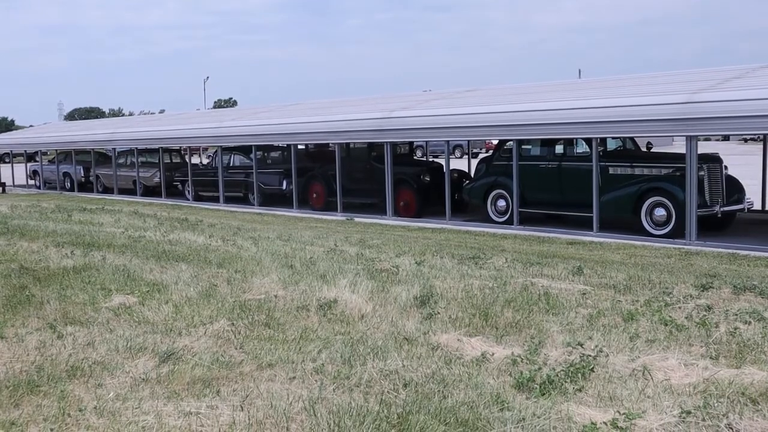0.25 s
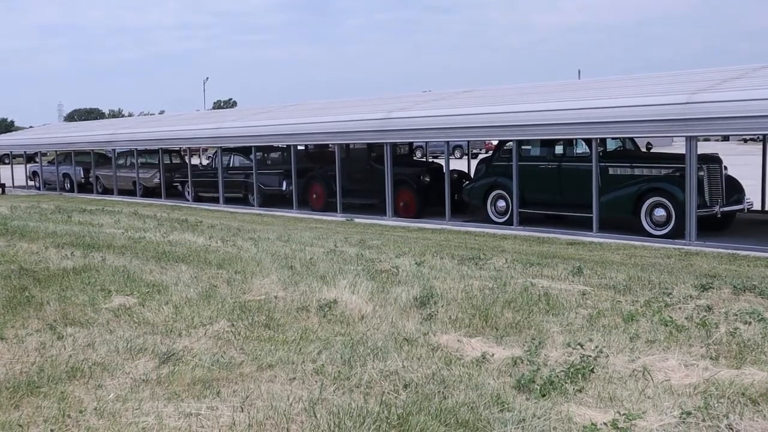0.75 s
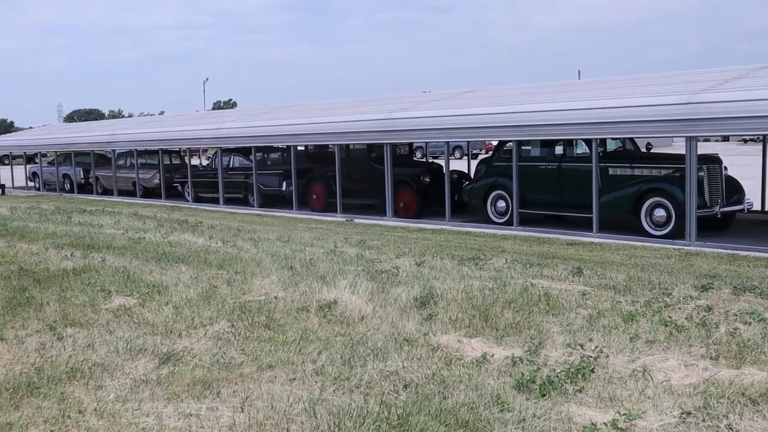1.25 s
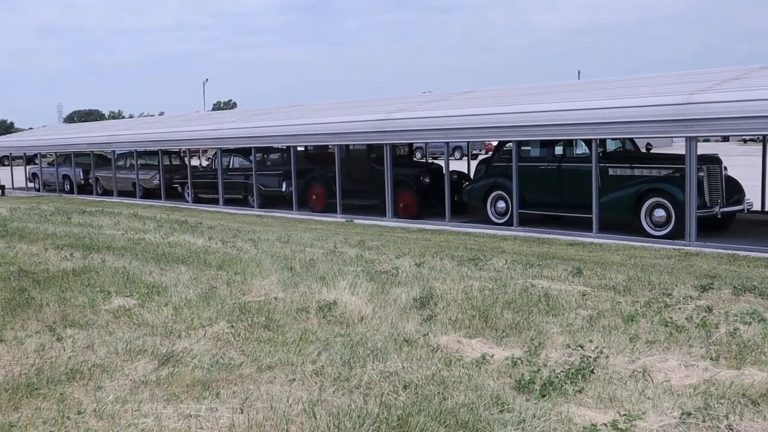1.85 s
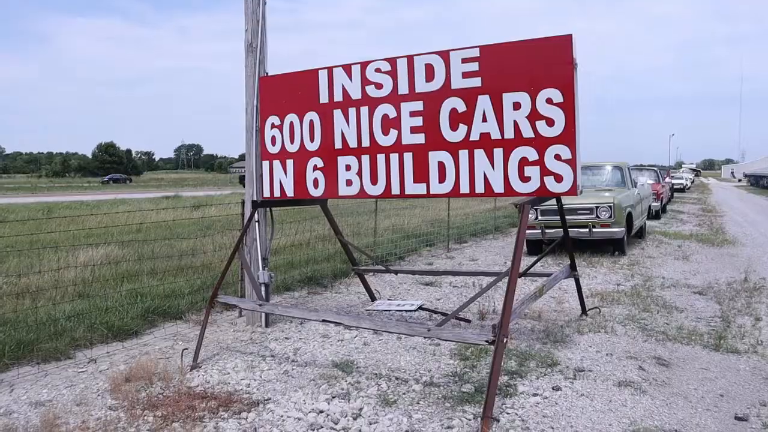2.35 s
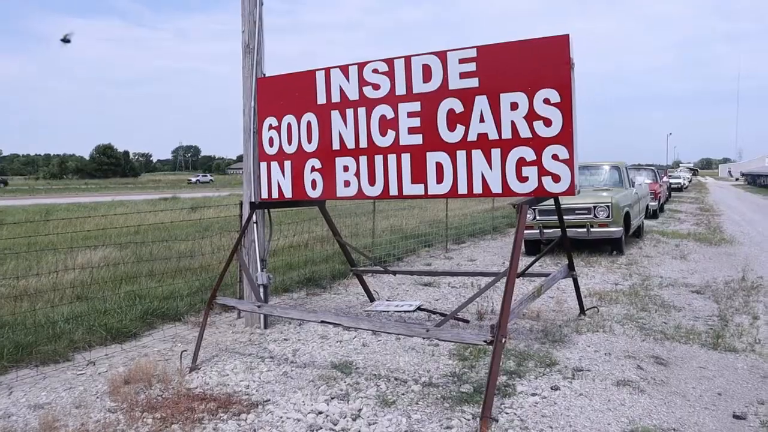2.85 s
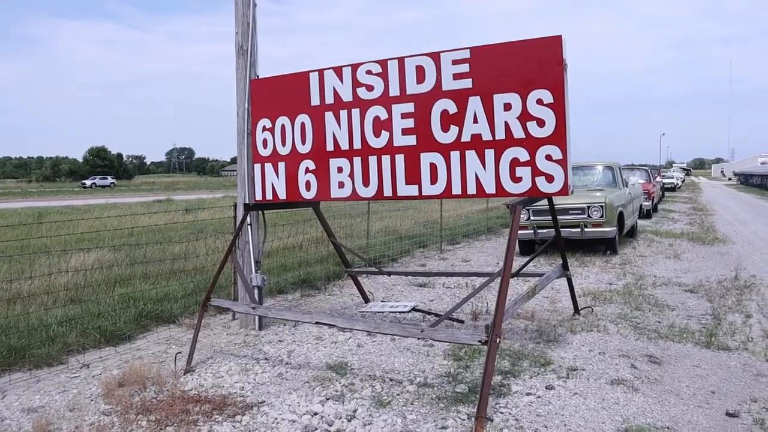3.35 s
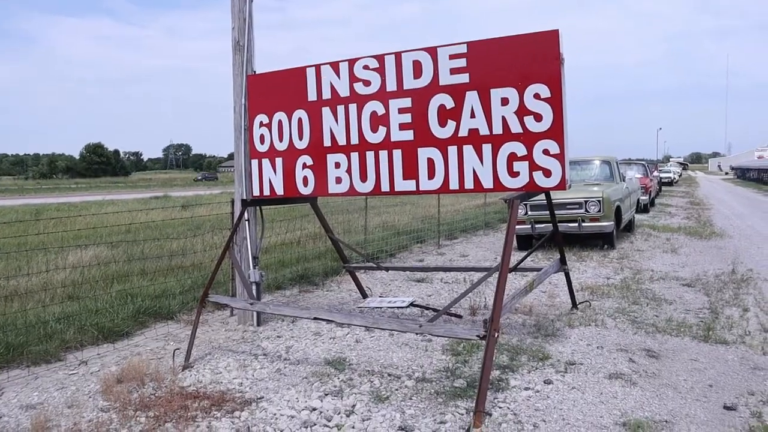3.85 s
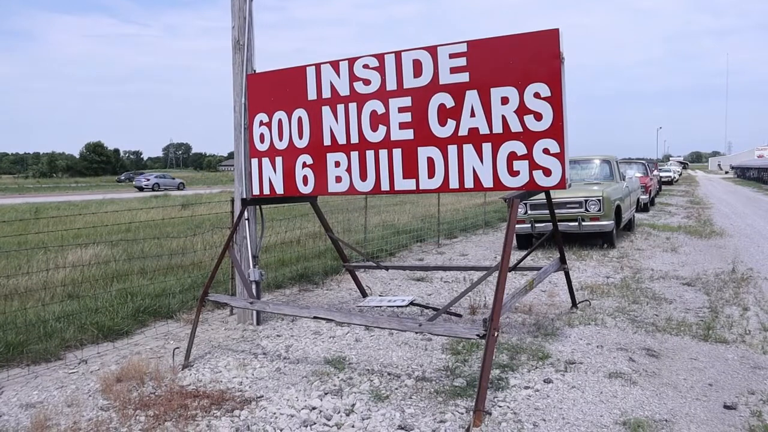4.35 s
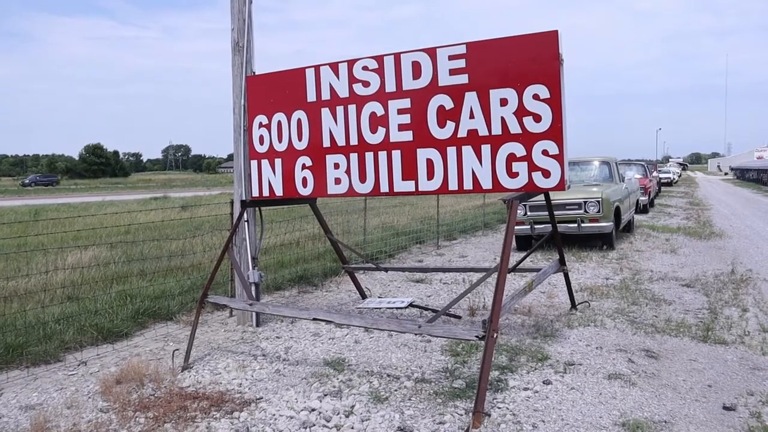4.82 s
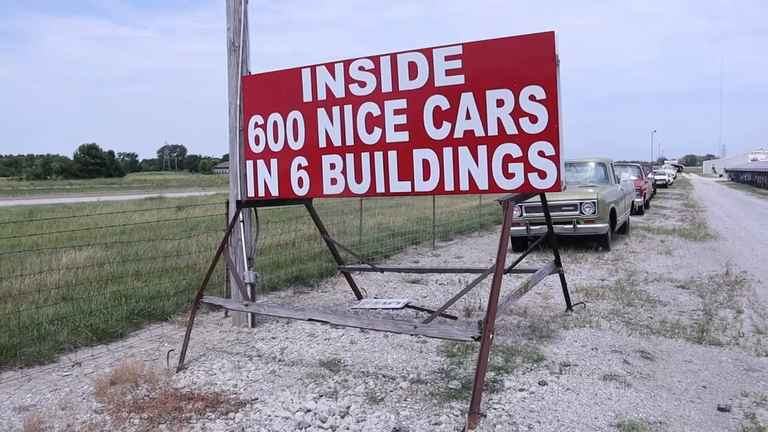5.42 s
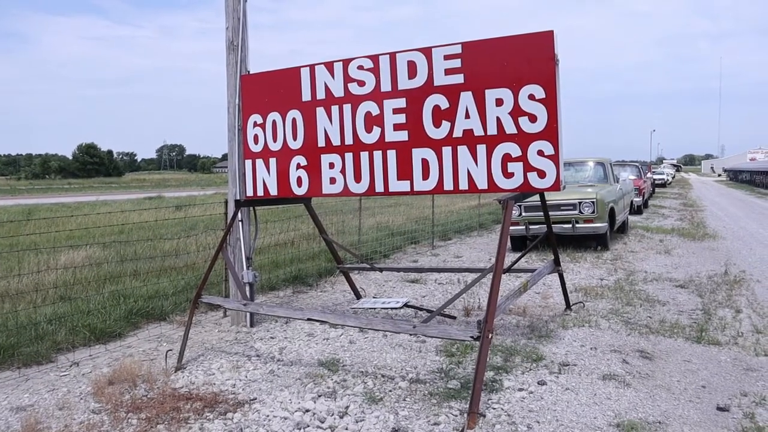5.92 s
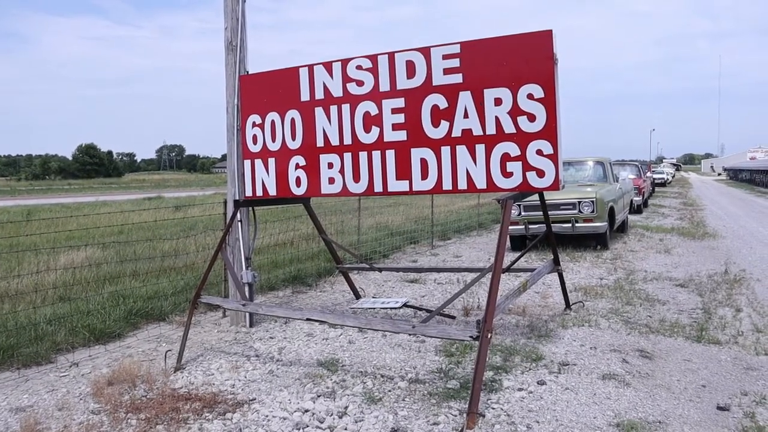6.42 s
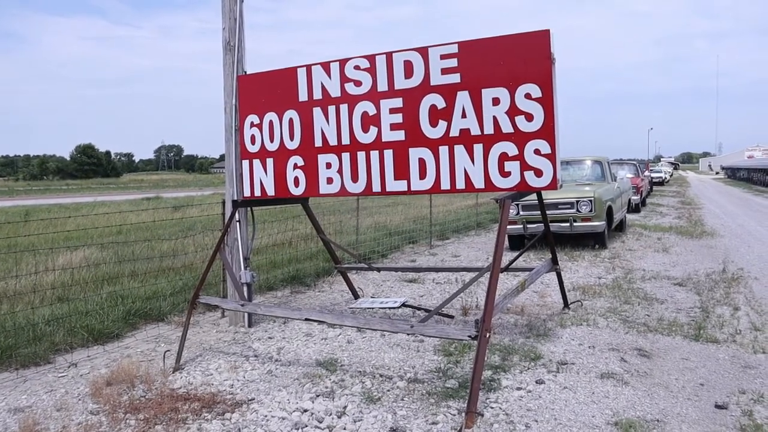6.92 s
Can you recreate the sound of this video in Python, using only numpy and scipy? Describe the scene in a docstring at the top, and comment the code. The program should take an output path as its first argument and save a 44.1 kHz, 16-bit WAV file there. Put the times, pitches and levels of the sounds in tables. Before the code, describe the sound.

Heavy wind buffeting outdoors, a tiny silent break, then highway tyre roar with lighter wind bumps, repeated high bird calls and a growing truck whine.

```python
"""Gusty wind thuds on two close microphone ports in an open field beside a highway, in two parts split by a short
near-silent gap. Wind is a sum of short damped pushes, dense weak ones plus listed hard ones, over a slow swing.
The second part has lighter gusts and adds tyre noise (patchy filtered noise, a sung whine, an engine hum) of far
cars and a nearing truck, gritty scuffs (gated noise) and a small bird (gliding sine). Far road hiss runs throughout.
Every source has a middle and a side colour; the outputs are their sum and difference."""
import sys
import numpy as np
from scipy import signal
from scipy.fft import rfft, irfft, next_fast_len
from scipy.io import wavfile
from scipy.ndimage import uniform_filter1d, map_coordinates

SR = 44100
rng = np.random.default_rng(int(sys.argv[2]) if len(sys.argv) > 2 else 0)


def master(y):
    """Save y as 16-bit WAV."""
    cut = np.clip(np.atleast_2d(y).T, -1, 1)
    pcm = np.round(cut * 32767)  # scale
    wavfile.write(sys.argv[1], SR, pcm.astype(np.int16))


N = 316638

# near-silent join of the two parts: (start [s], end [s])
GAP_START_S, GAP_END_S = (2.3057, 2.3392)


def amp(db):
    """Decibels to gain."""
    return 10 ** (np.asarray(db) / 20)


def unit(x):
    """Scale to rms 1."""
    return x / np.sqrt(np.mean(x ** 2, -1, keepdims=True) + 1e-20)


def along(points, hz):
    """Gain at hz from (frequency [Hz], level [dB]) points, interpolated on a log axis."""
    point_hz, point_db = np.transpose(points)
    return amp(np.interp(np.log(hz + 1), np.log(point_hz + 1), point_db))


def coloured(points):
    """Response of this colour that keeps white noise of rms 1 at rms 1."""
    return lambda hz: unit(along(points, hz))


def curves(rows):
    """One value per sample for each column after the time."""
    s, *columns = np.transpose(rows)
    return [np.interp(np.arange(N) / SR, s, column) for column in columns]


def wobble(rate_hz):
    """Smooth random curve with rate_hz knots a second."""
    knots = rng.standard_normal(int(N * rate_hz / SR) + 4)
    return map_coordinates(knots, [np.arange(N) * rate_hz / SR])


def filtered(x, response):
    """Apply a complex response of frequency to x."""
    m = 2 * next_fast_len(N // 2 + 4096)
    return irfft(rfft(x, m) * response(np.fft.rfftfreq(m, 1 / SR)), m)[..., :N]


def patchy(depth_db):
    """White noise whose gain drifts in patches of time and frequency."""
    z = signal.stft(rng.standard_normal(N), nperseg=512)[2]
    field = uniform_filter1d(rng.standard_normal(z.shape), size=6, axis=0)
    field = uniform_filter1d(field, size=12, axis=1)
    return signal.istft(z * amp(depth_db * field / field.std()), nperseg=512)[1][:N]


# far road hiss colours, middle and side: (frequency [Hz], relative level [dB per Hz])
FAR_MIDDLE = [(710, -32), (1200, -19), (1540, -6), (2890, -19.5), (5800, -32.5), (12100, -53)]
FAR_SIDE = [(1060, -36), (1800, -0.5), (1990, -11.5), (2720, -11.5), (11000, -29.5)]
FAR_DB = -60


def far_road():
    """Distant road: faint smooth hiss, filtered noise independent in middle and side."""
    colour = lambda hz: np.array([along(FAR_MIDDLE, hz), along(FAR_SIDE, hz)])
    return amp(FAR_DB) * unit(filtered(rng.standard_normal((2, N)), colour))


# stone scuffs: (peak time [s], envelope level [dB])
SCUFFS = [(3.864, -34), (3.895, -35.5), (3.965, -34)]
# grit colour: (frequency [Hz], relative level [dB per Hz])
GRIT = [(500, -33), (1200, 14.5), (2000, 11), (3500, -3.5), (5500, -12), (11000, -46)]
SCUFF_RISE_DB_PER_S, SCUFF_FALL_DB_PER_S = 695, 344
SCUFF_MIDDLE_DB, SCUFF_SIDE_DB = 0.5, -3


def scuff():
    """Gritty scuffs of stones: sparse sharp grains under short rises, stronger in front than to the side."""
    t = np.arange(N) / SR
    rises = np.zeros(N)
    for s, db in SCUFFS:
        drop_db = np.where(t < s, SCUFF_RISE_DB_PER_S * (s - t), SCUFF_FALL_DB_PER_S * (t - s))
        rises += amp(db - drop_db)
    grains = unit(rng.standard_normal((2, N)) * amp(3.4 * wobble(600)))
    return amp([[SCUFF_MIDDLE_DB], [SCUFF_SIDE_DB]]) * filtered(rises * grains, coloured(GRIT))


HUM_HZ, HUM_DB, HUM_ENDS_S = 230.5, -54, 3.8


def engine_hum():
    """Faint engine hum of the fading car: a steady sine that fades out over its last second."""
    t = np.arange(N) / SR
    return amp(HUM_DB) * np.clip(HUM_ENDS_S - t, 0, 1) * np.sin(2 * np.pi * HUM_HZ * t)


WHINE_FROM_S, WHINE_START_HZ, WHINE_SAG_HZ_PER_S = 5.4, 1099, 8.5
WHINE_START_DB, WHINE_GROWS_DB_PER_S = -38.5, 2  # before fade-in and wobble


def tread_whine():
    """Tread blocks singing: a sagging, growing sine whose pitch blurs as the truck nears."""
    since = np.arange(N) / SR - WHINE_FROM_S
    level = amp(WHINE_START_DB + WHINE_GROWS_DB_PER_S * since) * np.clip(since / 0.2, 0, 1)
    hz = WHINE_START_HZ - WHINE_SAG_HZ_PER_S * since
    blur_hz = 1.8 * since ** 2 * wobble(15)
    phase = 2 * np.pi * np.cumsum(hz + blur_hz) / SR
    return level * amp(wobble(5)) * np.sin(phase)


# a car fading, then the truck nearing; levels before the swell:
# (time [s], roar [dB], hiss [dB], side roar [dB], side hiss [dB])
ROAD = [(2.35, -31.5, -42, -41, -43), (2.55, -32.5, -42.5, -44.5, -42.5), (2.83, -33, -49, -42, -43),
        (2.92, -34, -46.5, -42, -41.5), (3.4, -33.5, -47.5, -39, -40.5), (3.8, -35, -48.5, -45, -41.5),
        (4.3, -34.5, -46, -44.5, -43), (5.25, -34, -43.5, -44, -42), (5.38, -33, -42.5, -52, -46),
        (5.72, -32, -42, -52, -43.5), (5.85, -30.5, -42, -42, -42), (6.28, -32, -38, -46, -42),
        (6.55, -28, -36, -42, -39), (6.87, -25.5, -33.5, -45, -40), (7.18, -26.5, -32.5, -47, -38)]
# brief changes of the top treble: (time [s], rise [dB], side rise [dB], width [s])
FLARES = [(3.379, 8, 4.5, .12), (3.95, -15, 6.5, 0.18), (6.3, 7, 0, 0.15), (6.868, 8.5, 10.5, 0.22)]
# tyre noise colours: (frequency [Hz], relative level [dB per Hz])
ROAR = [(40, -23), (120, -15.5), (300, -20.5), (520, -11), (700, -2.5), (850, 0.5), (1140, 0.5),
        (1500, -6.5), (2000, -11.5), (3000, -47), (6000, -120)]
HISS = [(400, -88), (1000, -30), (1600, -8.5), (2200, -1), (3000, -7.5), (4200, -12.5), (6000, -24.5),
        (8000, -31), (12000, -120)]
FIZZ = [(1500, -90), (3500, -25.5), (5500, -1.5), (7500, -11), (10500, -10), (12500, -20), (14000, -33.5)]
# extra colour of the side: (frequency [Hz], gain [dB])
SIDE_TILT = [(300, -54), (650, -24), (1200, 1.5), (2200, 2.5), (4000, 8), (7000, 7), (12000, 5)]
HISS_REF_DB, FIZZ_AT_REF_DB, FIZZ_DB_PER_HISS_DB, SIDE_FIZZ_DB = -46, -68, 0.81, -55  # before flares


def traffic():
    """Tyre roar, hiss and fizz; the road lies a little to the right, so some roar enters the side inverted."""
    t = np.arange(N) / SR
    roar_db, hiss_db, side_roar_db, side_hiss_db = curves(ROAD)
    flare_db, side_flare_db = np.zeros((2, N))
    for s, rise_db, side_rise_db, width in FLARES:
        bump = np.exp(-((t - s) / width) ** 2)
        flare_db += rise_db * bump
        side_flare_db += side_rise_db * bump
    fizz_db = FIZZ_AT_REF_DB + FIZZ_DB_PER_HISS_DB * (hiss_db - HISS_REF_DB) + flare_db
    side_fizz_db = SIDE_FIZZ_DB + side_flare_db
    # (colour, level [dB], side level [dB], lean: share of the middle in the side, patch depth [dB])
    bands = [(ROAR, roar_db, side_roar_db, -.65, 1.3),
             (HISS, hiss_db, side_hiss_db, -.15, 1.2),
             (FIZZ, fizz_db, side_fizz_db, .1, 2.2)]
    middle, side = np.zeros((2, N))
    for points, level_db, side_db, lean, depth_db in bands:
        near = patchy(depth_db)
        wide = lean * near + np.sqrt(1 - lean ** 2) * patchy(1.2)
        side_colour = lambda hz: along(points, hz) * along(SIDE_TILT, hz)
        middle += amp(level_db) * unit(filtered(near, lambda hz: along(points, hz)))
        side += amp(side_db) * unit(filtered(wide, side_colour))
    whine = tread_whine()
    middle += whine + engine_hum()
    side -= whine * amp(side_roar_db - roar_db)  # leans as the roar does
    swell = amp(0.32 * wobble(6) + 0.12 * wobble(32))
    return swell * np.array([middle, side])


# one call: (share of length, share of the way from low to opening pitch, share of closing lift, level [dB])
CALL = [(0, .9, 0, -14), (.12, 1, 0, -2), (.22, .5, 0, -10), (.31, .14, 0, -4), (.62, 0, 0, -1),
        (.76, 0, .2, -1), (.9, 0, 1, 0), (1, 0, .8, -14)]
# calls: (time [s], length [s], low pitch [Hz], opening pitch [Hz], level before flutter [dB])
CALLS_HEARD = [(2.44, .135, 4050, 4490, -39), (2.898, .118, 3990, 4670, -41), (3.4, .122, 3960, 4380, -40),
               (3.944, .14, 4050, 4570, -39), (4.538, .138, 4065, 4530, -39),
               (5.203, .122, 3960, 4480, -43), (5.815, .135, 4010, 4490, -45),
               (6.432, .135, 3985, 4510, -39), (7.03, .132, 4025, 4480, -41)]
END_LIFT_HZ = 170


def bird():
    """Small bird: a sine falls, holds, then lifts; far to one side, it is nearly opposite at the two ports."""
    voice = np.zeros(N + SR)
    share, opening, lift, shape_db = np.transpose(CALL)
    for s, length, low_hz, top_hz, db in CALLS_HEARD:
        u = np.linspace(0, 1, round(length * SR))
        corners_hz = low_hz + (top_hz - low_hz) * opening + END_LIFT_HZ * lift
        hz = uniform_filter1d(np.interp(u, share, corners_hz), size=300)
        level = amp(db + np.interp(u, share, shape_db))
        voice[round(s * SR):][:len(u)] += level * np.sin(2 * np.pi * np.cumsum(hz) / SR)
    voice = voice[:N] * amp(1.3 * wobble(70))
    # the ports cancel best near one pitch; higher and lower parts leak into the middle
    leak = lambda hz: -1j * np.clip(.05 + np.abs(hz - 4020) / 1300, 0, .25)
    return np.array([filtered(voice, leak), voice])


# slow pressure swing: (time [s], level [dB])
RUMBLE = [(0, -37), (2.3, -40), (2.33, -50), (3.04, -50), (3.28, -34), (3.9, -44.5), (4.28, -38),
          (4.94, -41), (5.24, -35), (5.56, -42), (5.7, -58), (6.32, -34), (6.52, -30), (6.8, -59.5),
          (7.18, -65.5)]
# swing colour: (frequency [Hz], relative level [dB per Hz])
SWING = [(25, -36.5), (60, -14), (110, -6), (170, -3.5), (260, -6.5), (500, -57), (1000, -120)]


def pressure_swing():
    """Slow pressure swings on both ports alike: low filtered noise."""
    noise = unit(amp(0.8 * wobble(35)) * rng.standard_normal(N))
    return filtered(noise * amp(curves(RUMBLE)[0]), coloured(SWING))


# steady wind before puffs and lulls, three calms in the second part: (time [s], strength [dB])
WIND = [(0, -20), (.12, -33), (.55, -29.5), (.9, -29), (1.15, -23), (1.47, -17.5), (1.54, -27), (1.6, -25),
        (1.86, -21), (1.98, -25.5), (2.02, -30), (2.07, -25), (2.3, -22), (2.325, -51.5), (3.03, -53.5),
        (3.12, -41), (3.26, -27), (3.52, -31), (4.0, -34.5), (4.45, -32.5), (4.6, -31.5), (4.95, -28.5),
        (5.2, -26), (5.56, -31), (5.7, -56), (5.99, -51), (6.04, -43), (6.25, -34.5), (6.38, -27),
        (6.6, -24.5), (6.64, -37), (6.79, -62), (6.96, -53), (7.03, -22.5), (7.18, -31.5)]
# short puffs: (peak time [s], strength [dB], fall time [s])
PUFFS = [(-0.001, -28.5, 0.13), (0.263, -24.5, 0.086), (0.615, -31, 0.044), (0.802, -23.5, 0.014),
         (1.033, -32.5, 0.016), (1.59, -21, 0.037), (1.715, -26, 0.046), (2.224, -19.5, 0.078),
         (3.286, -26.5, 0.039), (3.46, -24, 0.063), (3.682, -21, 0.015), (3.826, -26, 0.015),
         (3.923, -29, 0.027), (4.068, -25, 0.03), (4.365, -26.5, 0.03), (5.185, -24.5, 0.039),
         (5.261, -20.5, 0.04), (6.05, -31, 0.049), (6.136, -29, 0.022), (6.219, -29.5, 0.013),
         (6.306, -26.5, 0.037), (6.5, -23.5, 0.036)]
# brief drops between gusts: (time [s], depth [dB])
LULLS = [(.722, 7), (0.757, 10.5), (.912, 15.5), (1.231, 11.5), (1.298, 5), (1.368, 4.5), (1.922, 7),
         (2.189, 6), (4.45, 14)]
PUFF_RISE_OVER_FALL, LULL_WIDTH_S = 0.52, 0.0087


def strength():
    """Wind strength in dB: steady wind and puffs add in power; lulls cut into both."""
    t = np.arange(N) / SR
    power = amp(curves(WIND)[0]) ** 2
    for s, db, fall in PUFFS:
        same_part = (t < GAP_START_S) == (s < GAP_START_S)
        width = fall * np.where(t < s, PUFF_RISE_OVER_FALL, 1)
        power += same_part * amp(db) ** 2 * np.exp(-((t - s) / width) ** 2)
    lull_db = sum(depth_db * np.exp(-((t - s) / LULL_WIDTH_S) ** 2) for s, depth_db in LULLS)
    return 10 * np.log10(power) - lull_db


PEAK_TURNS = 1.25  # cycles from the start of a push to its peak


def eddies(s, db, bright_db, scatter, cycles):
    """Each eddy is one push about a cycle long, shorter if brighter; returns the shared and the one-port parts."""
    luck = rng.standard_normal((len(s), 3))
    spread = np.exp(scatter * luck[:, 0].clip(-2.4, 2.4))
    hz = np.clip(480 * np.exp(0.034 * (bright_db + 15)) * spread, 200, 3000)
    k = np.arange(SR // 70)
    turns = hz[:, None] * k / SR - PEAK_TURNS
    phase = 2 * np.pi * turns + np.pi * luck[:, 1:2]
    peak = amp(db) * spread ** -.5
    push = peak[:, None] * np.cos(phase) / np.cosh(turns / cycles) ** 2
    start = np.round((s - PEAK_TURNS / hz) * SR).astype(int).clip(0)
    where = (start[:, None] + k).ravel()
    shares = np.ones(len(s)), luck[:, 2]
    return np.array([np.bincount(where, (push * w[:, None]).ravel(), N + SR)[:N] for w in shares])


# hard eddies before the port response: (peak time [s], peak level [dB], brightness [dB])
THUDS = [(0.035, -13.5, -20), (0.144, -12, -7), (0.175, -8, -18), (0.273, -16, -12), (0.397, -7, -9.5),
         (0.447, -13, -17.5), (0.589, -13.5, -16.5), (0.619, -7.5, -13), (0.635, -7.5, -21),
         (0.668, -13, -12.5), (0.68, -16.5, -7), (0.737, -14.5, -22), (0.783, -12, -23),
         (0.853, -15.5, -16), (0.929, -8, -15), (1.04, -8, -23.5), (1.123, -8, -19), (1.161, -15, -11),
         (1.194, -6.5, -3.5), (1.259, -7, -13), (1.307, -10, -1), (1.339, -6, -16.5), (1.377, -9.5, -1.5),
         (1.423, -14.5, 0), (1.467, -9.5, 7), (1.578, -10.5, -3.5), (1.691, -14.5, -4.5),
         (1.734, -12.5, -7.5), (1.775, -13, -16), (1.862, -12.5, -8), (1.976, -11.5, -1.5),
         (2.117, -11.5, -5.5), (2.203, -9.5, 0.5), (2.243, -6, -9), (2.277, -15, 0), (3.285, -12, -15),
         (3.307, -11, -13), (3.392, -11.5, -7), (3.691, -9, -15), (4.078, -8.5, -13), (4.107, -10, -18),
         (4.711, -16, -10), (4.913, -15.5, -11), (5.1, -11.5, -23), (5.227, -10.5, 0), (5.279, -10.5, -2),
         (5.301, -11, -13), (6.396, -11, -11.5)]
# port response to wind: (frequency [Hz], gain [dB])
PORT = [(25, -47), (60, -22), (150, -6), (300, 1), (700, 1.5), (1200, 1), (2000, -3), (3200, -9.5),
        (6000, -49), (12000, -100)]
# side over middle before the mixing gains: (frequency [Hz], gain [dB])
WIND_SIDE = [(150, -55), (270, -33.5), (460, -19), (900, -10), (1700, -1.5), (3200, 4.5)]
# first part: brightness at the reference strength and its growth; second part: constant
BRIGHT_REF_DB, BRIGHT_AT_REF_DB, BRIGHT_DB_PER_DB, BRIGHT_SECOND_DB = -25, -13, 1.64, -15.5
CRACK_DB, CRACK_BRIGHTER_DB, CRACK_LEAD_S = -14, 21.5, 0.00071  # all relative to the thud


def wind():
    """Wind on the ports: a dense clumped patter of eddies, hard thuds with thin cracks, and a slow swing."""
    level_db = strength()
    first = np.arange(N) / SR < GAP_START_S
    held_db = np.maximum(level_db, uniform_filter1d(level_db, size=2600))
    first_bright_db = BRIGHT_AT_REF_DB + BRIGHT_DB_PER_DB * (held_db - BRIGHT_REF_DB)
    bright_db = np.where(first, first_bright_db, BRIGHT_SECOND_DB)

    when, size = rng.random((8000, 2)).T
    at = ((np.arange(len(when)) + when) / len(when) * (N - 1)).astype(int)  # evenly strewn
    clumps_db = 2.4 * wobble(110)
    patter_db = (level_db + clumps_db)[at] - 3.55 * np.log(size + 0.025) - 5.0  # few strong, many weak
    patter = eddies(at / SR, patter_db, bright_db[at], scatter=0.41, cycles=0.42)

    s, db, edge_db = np.transpose(THUDS)
    thuds = eddies(s, db, edge_db, scatter=0.031, cycles=0.34)
    cracks = eddies(s - CRACK_LEAD_S, db + CRACK_DB, edge_db + CRACK_BRIGHTER_DB, scatter=0.075, cycles=0.45)

    shared, own = filtered(patter + thuds + cracks, lambda hz: along(PORT, hz))
    # the shared push reaches one port first: nearly a quarter-cycle shift in the side
    side = filtered(shared, lambda hz: (0.17 + .6j) * along(WIND_SIDE, hz))
    side += .6 * filtered(own, lambda hz: along(WIND_SIDE, hz))
    return np.array([shared + pressure_swing(), side])


def scene():
    """Wind and far hiss fill both parts; road, scuff and bird belong to the second."""
    second = np.arange(N) / SR > GAP_START_S
    middle, side = wind() + far_road() + second * (traffic() + scuff() + bird())
    return np.array([middle + side, middle - side])


GAP_DB, TOP_HZ = -50.0, 13300


def record(dry):
    """Near silence in the gap; nothing above the band limit."""
    t = np.arange(N) / SR
    join = np.where((t > GAP_START_S) & (t < GAP_END_S), amp(GAP_DB), 1)
    join = uniform_filter1d(join, size=24)  # edges fade over half a millisecond
    return filtered(join * dry, lambda hz: hz < TOP_HZ)


dry = scene()
out = record(dry)
master(out)
```